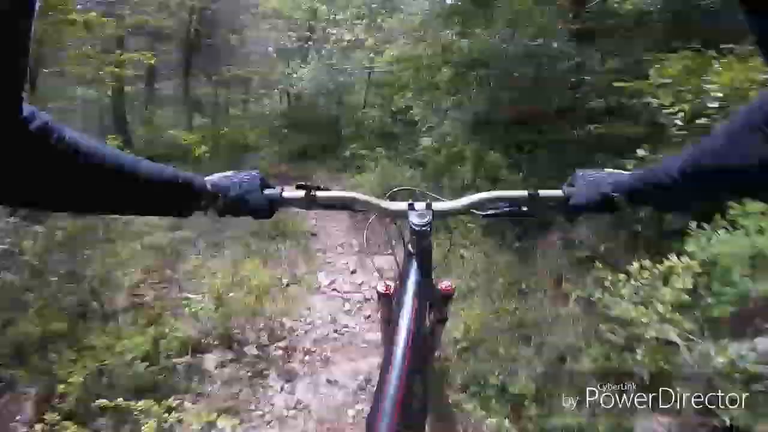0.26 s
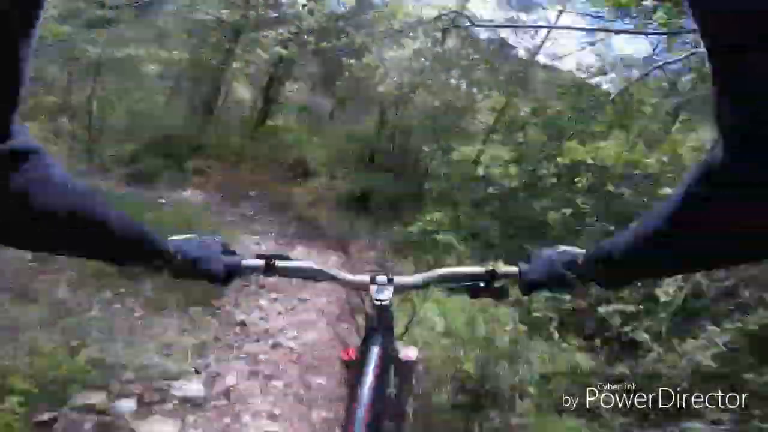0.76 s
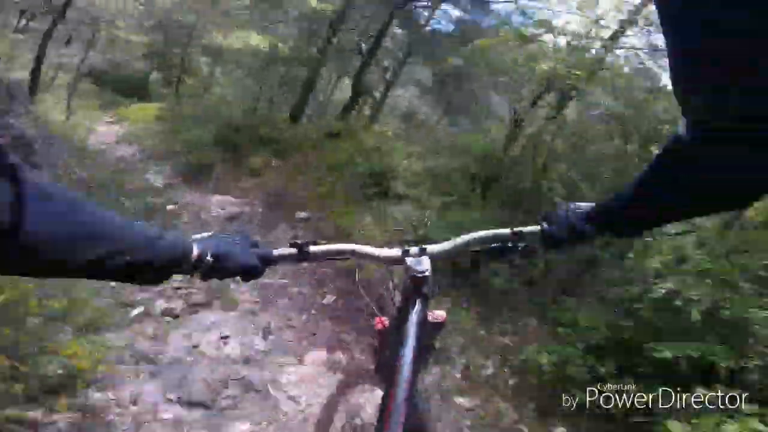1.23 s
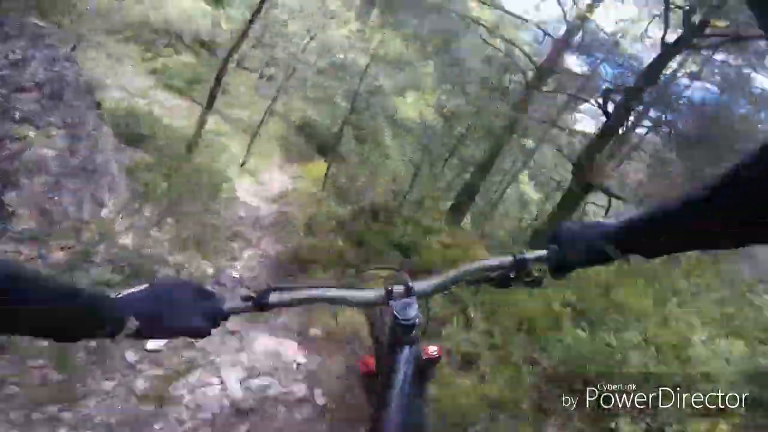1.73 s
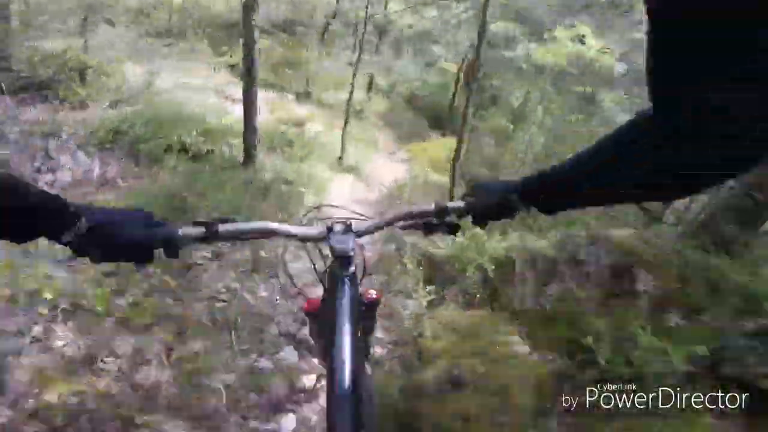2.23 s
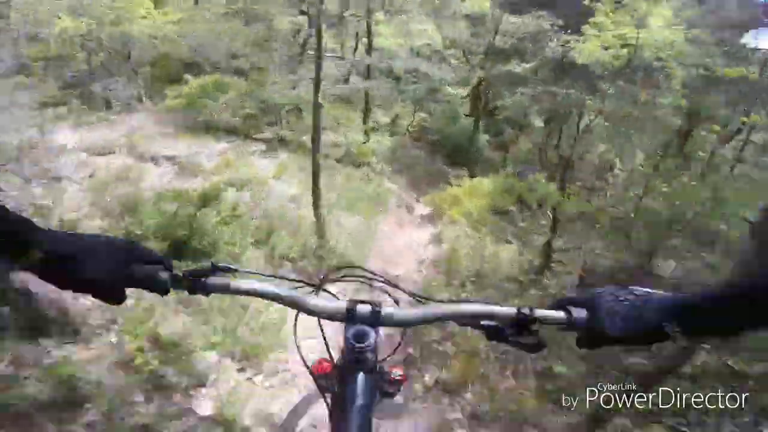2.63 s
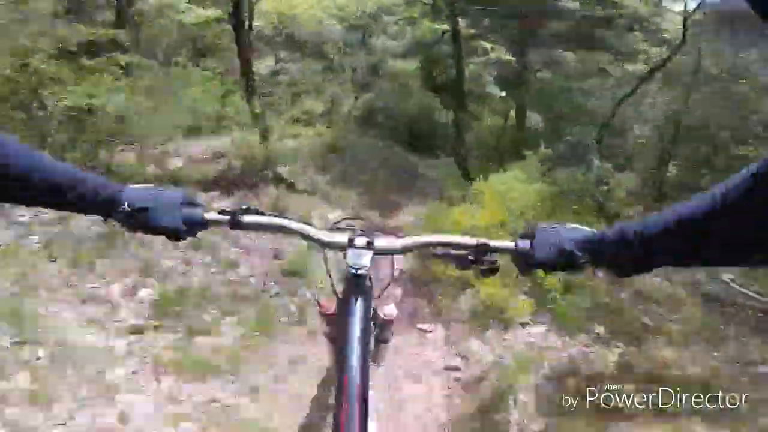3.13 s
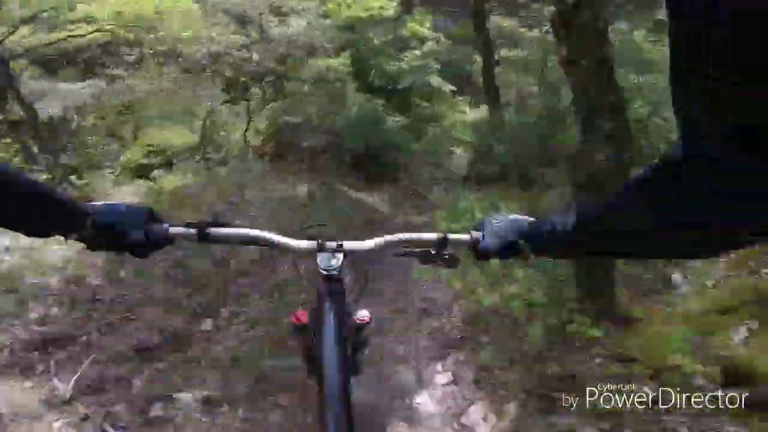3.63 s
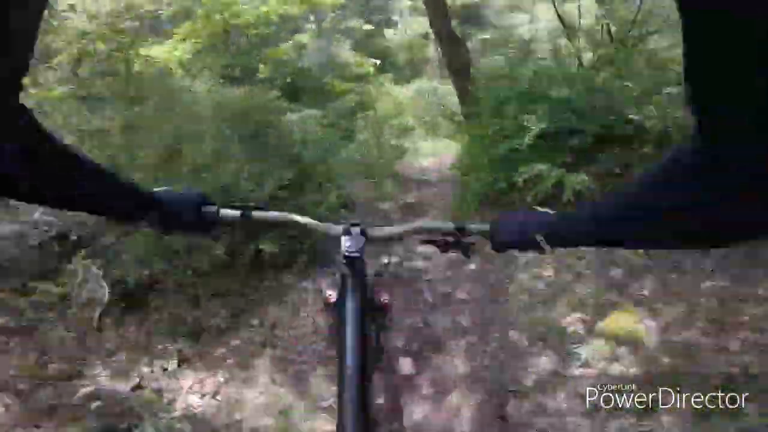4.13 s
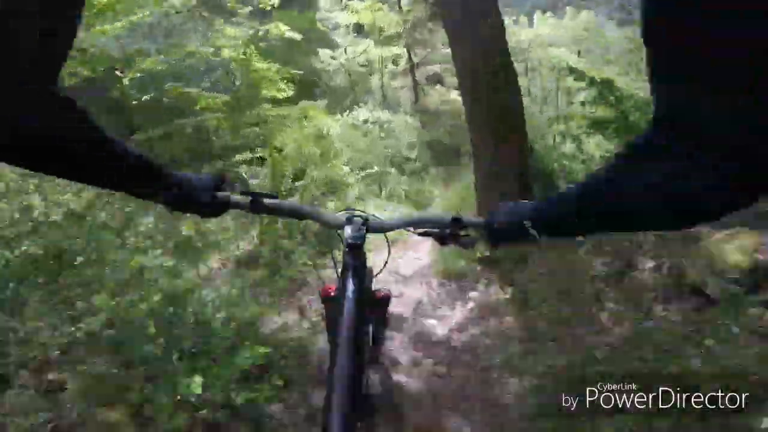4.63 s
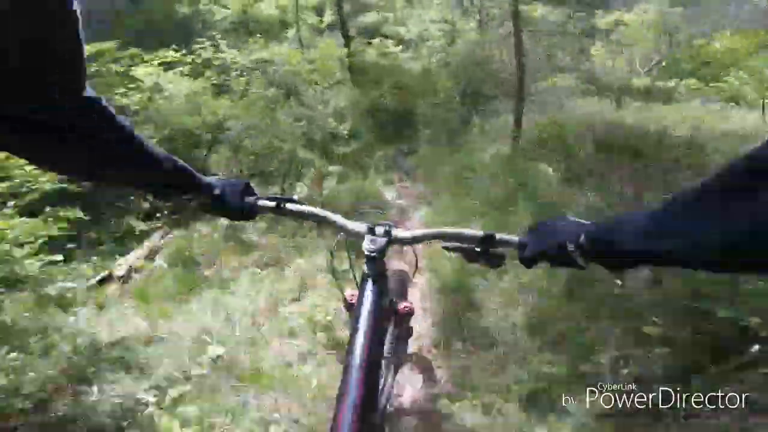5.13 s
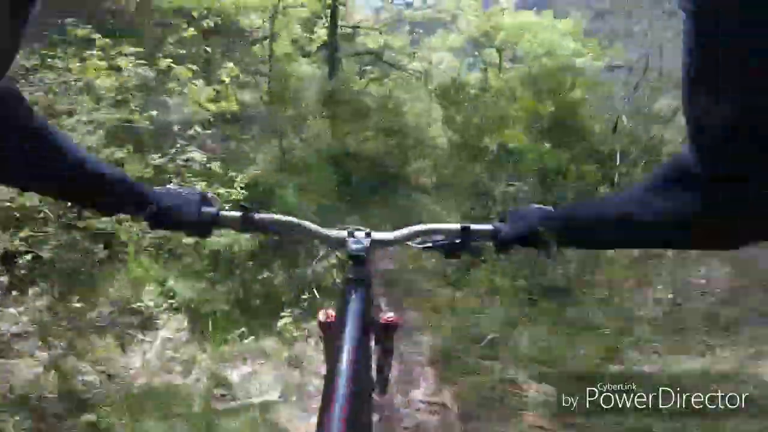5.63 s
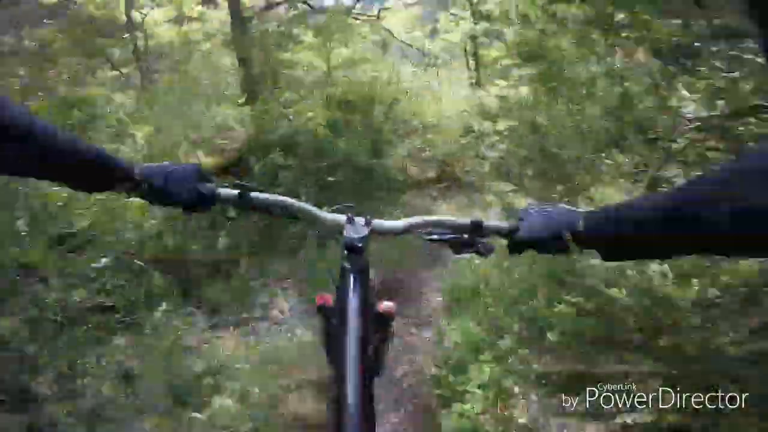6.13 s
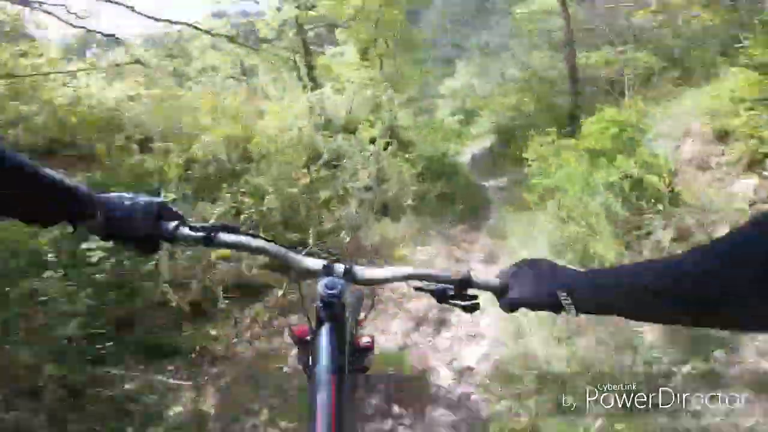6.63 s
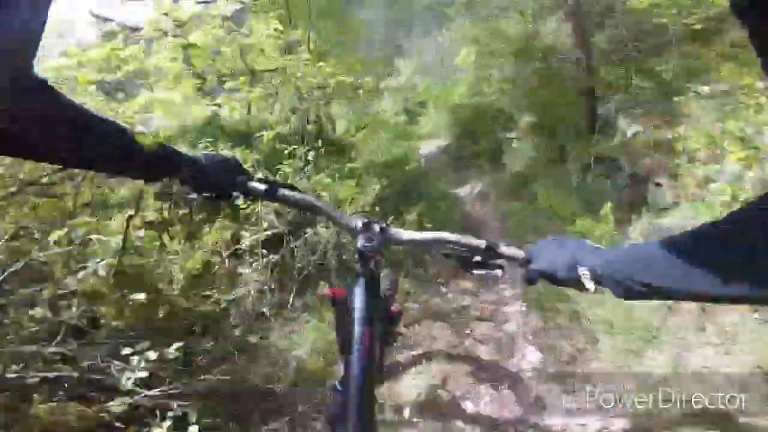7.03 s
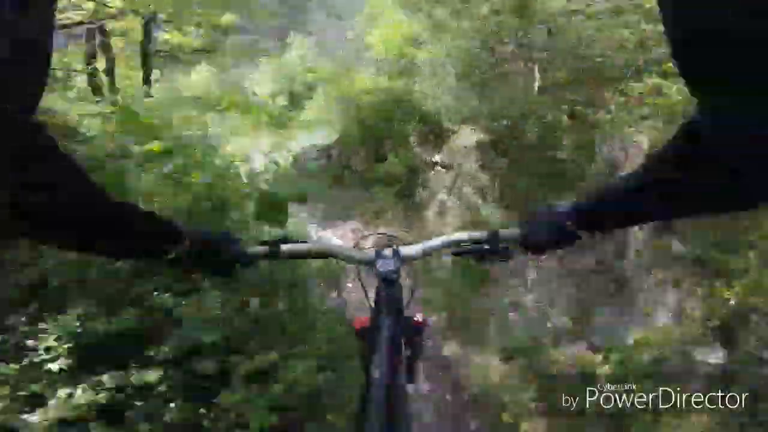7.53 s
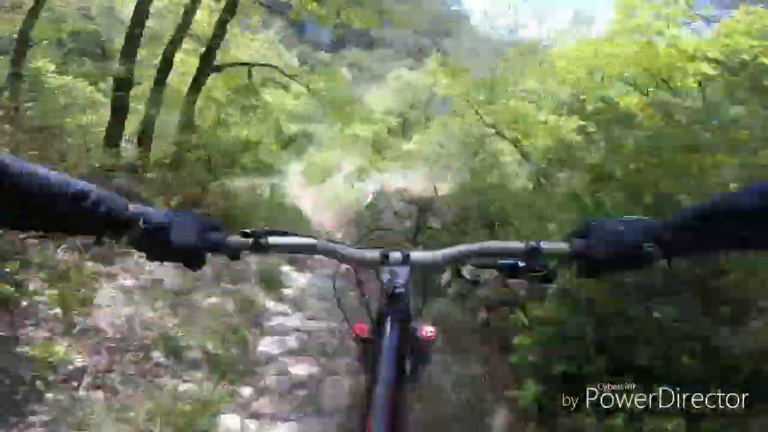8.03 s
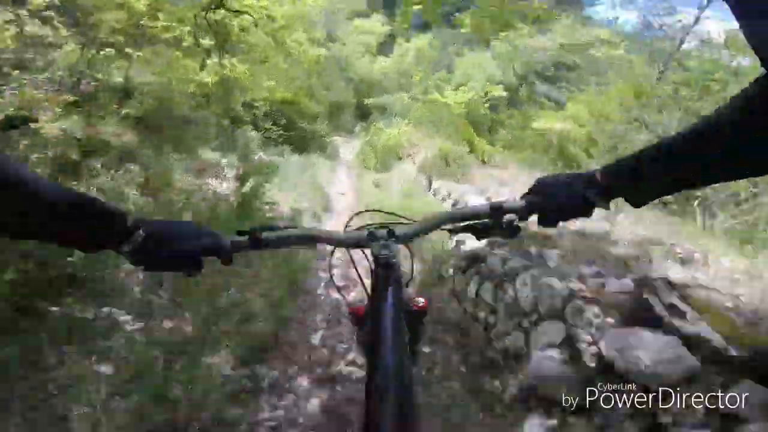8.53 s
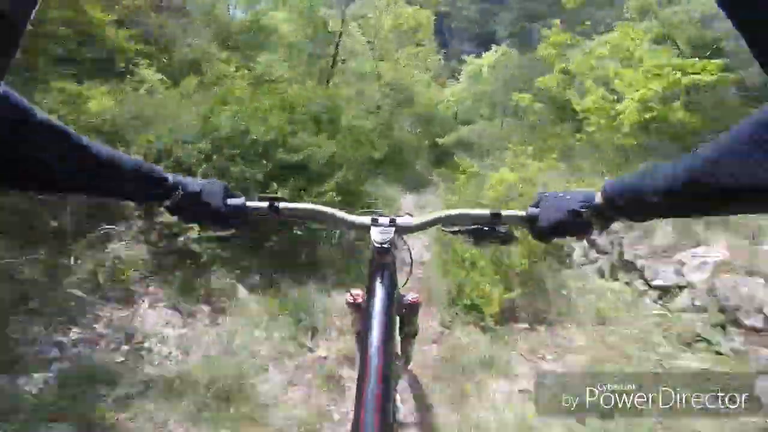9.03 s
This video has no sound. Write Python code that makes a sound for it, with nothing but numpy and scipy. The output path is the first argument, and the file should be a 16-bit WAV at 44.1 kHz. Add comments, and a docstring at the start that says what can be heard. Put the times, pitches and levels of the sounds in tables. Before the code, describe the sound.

Hard hollow knocks and dense rattle as a mountain bike rolls down a stony woodland trail, with low wind rumble buffeting a chest-worn microphone.

```python
"""Hard knocks and rattle near 1 kHz over rumbling wind: a mountain bike rolls down a stony woodland trail,
heard by a small cased microphone on the rider's chest.
Wind noise presses on the case; struck modes ring for jolts and knocks on its mount.
Chain slaps and stone ticks are short noise bursts, gravel is dense random grains,
both thin and muffled through resonances of the case."""
import sys
import numpy as np
from scipy import signal
from scipy.io import wavfile
from scipy.ndimage import uniform_filter1d

SR = 44100
rng = np.random.default_rng(int(sys.argv[2]) if len(sys.argv) > 2 else 0)


def to_wav(s):
    """Save 16-bit WAV."""
    ch = np.atleast_2d(s).T  # columns
    pcm = np.round(np.clip(ch, -1, 1) * 32767)  # PCM
    wavfile.write(sys.argv[1], SR, pcm.astype(np.int16))


N = 409248

# Wind on the case. Each row: time in seconds, slow buffet in dB, faster eddies in dB.
WIND_CURVE = [(0.0, -9.5, -17.5), (0.45, -21, -24.5), (0.9, -27, -29), (1.29, -33, -33.5),
              (1.68, -13.5, -28), (1.83, -19, -24.5), (2.04, -19, -27), (2.43, -10, -11),
              (2.58, -11.5, -19.5), (3.52, -19, -15), (3.72, -27, -22), (4.44, -18, -18.5),
              (4.96, -20, -22), (5.17, -12.5, -12.5), (5.3, -16.5, -31.5), (5.84, -24.5, -34.5),
              (6.23, -16.5, -22), (6.28, -24, -32), (6.48, -25.5, -33.5), (7.49, -14, -18),
              (7.96, -17.5, -36), (8.06, -16, -37), (8.4, -13.5, -17.5), (8.76, -16, -18.5),
              (9.28, -13.5, -17.5)]
# Short swells of low wind rumble, faint to strong. Each row: centre in seconds, level in dB,
# width in seconds (at least 0.01).
RUMBLE_SWELLS = [(0.138, -18, 0.032), (0.344, -18, 0.015), (0.518, -12.5, 0.032), (0.764, -20, 0.035),
                 (1.083, -20, 0.06), (1.291, -23.5, 0.092), (1.576, -35, 0.14), (1.767, -10.5, 0.037),
                 (1.85, -9, 0.016), (2.116, -28, 0.026), (2.34, -4, 0.032), (2.598, -29, 0.026),
                 (2.834, -12, 0.071), (3.551, -9.5, 0.077), (3.707, -22, 0.0081), (4.056, -7.5, 0.02),
                 (4.266, -17, 0.038), (4.661, -14, 0.026), (4.806, -21, 0.036), (5.16, -8, 0.025),
                 (5.341, -29, 0.02), (5.429, -31, 0.021), (5.653, -19, 0.056), (6.017, -14.5, 0.023),
                 (6.145, -24, 0.02), (6.569, -16, 0.011), (6.788, -13.5, 0.042), (6.86, -12.5, 0.024),
                 (7.132, -7, 0.027), (7.273, -4, 0.018), (7.506, -11, 0.16), (7.784, -26, 0.018),
                 (8.118, -11, 0.026), (8.261, -6, 0.01), (8.346, -6, 0.025), (8.42, -1.5, 0.012),
                 (8.635, -10, 0.039), (8.782, -9.5, 0.09), (8.856, -8, 0.019), (8.982, -11, 0.07)]
# Ride over the stones. Each row: time in seconds, rattle of the case in dB, gravel crunch in dB,
# fine spray in dB, thud of the mount in dB relative to the rattle.
RIDE_CURVE = [(0.0, -28.5, -51, -58, -4), (0.15, -30.5, -47.5, -60, 7.5), (0.31, -26.5, -46, -55, -8),
              (0.4, -27.5, -50, -58, 1), (0.53, -31.5, -50.5, -59, 2), (0.65, -22.5, -62, -76, -4),
              (0.74, -32.5, -59, -71, -2), (0.85, -34, -48, -61, 4.5), (0.98, -40.5, -62, -64.5, -11),
              (1.15, -45, -58, -62, -4), (1.34, -38.5, -51.5, -64, -3), (1.52, -31, -54, -70, -4.5),
              (1.67, -31.5, -46.5, -52, 0.5), (1.74, -28, -45, -57, -9), (1.96, -42.5, -58.5, -73, -2),
              (2.25, -33.5, -57.5, -68, -0.5), (2.35, -34, -54, -70, 8), (2.46, -38, -48, -59, -9),
              (2.54, -37.5, -54.5, -63, -4), (2.61, -30.5, -43.5, -60, -4), (2.89, -35, -56, -68, 4),
              (3.23, -41, -55, -76, -3), (3.57, -35.5, -57.5, -66, 6.5), (3.78, -40.5, -65, -75, 4),
              (3.93, -44, -76, -78, 1), (4.05, -46.5, -62, -70, -21), (4.22, -43.5, -58.5, -72, -2),
              (4.47, -32.5, -55, -63, 4.5), (5.01, -40.5, -53, -72, 2.5), (5.32, -33, -49, -62, 0.5),
              (5.45, -25, -47, -61, -1.5), (5.66, -34.5, -46, -68, 0.5), (5.84, -25.5, -44.5, -69, 4),
              (5.94, -35.5, -52.5, -68, -1.5), (6.07, -29, -50, -69, -1.5), (6.33, -34, -48.5, -57, -1.5),
              (6.38, -28.5, -46.5, -62, -6), (6.61, -38, -53.5, -62.5, -9), (6.69, -30, -51.5, -60, -2),
              (6.95, -53, -56, -70, 1), (7.11, -32, -47.5, -54.5, 0.5), (7.44, -32.5, -46, -50, -4.5),
              (7.66, -30.5, -43.5, -58, -4), (7.745, -32, -40, -44, -2.5), (7.88, -25.5, -44.5, -54.5, -2),
              (8.27, -35.5, -54.5, -66.5, 1.5), (8.42, -36, -56, -65, 6.5), (8.58, -38.5, -49, -59, -3),
              (8.66, -38.5, -59, -72, 0), (8.75, -40, -53, -58, 0.5), (8.93, -35.5, -56, -62, 4),
              (9.05, -39.5, -59, -72, -3), (9.12, -37, -64, -71, 3), (9.28, -23, -48, -68, -2)]
# Tyres skid through loose gravel. Each row: time in seconds, crunch level in dB, width in seconds (at least 0.01).
SKIDS = [(0.224, -43.5, 0.077), (0.617, -42.5, 0.1), (0.779, -47, 0.072), (1.05, -50.5, 0.089),
         (1.199, -48.5, 0.026), (1.648, -42.5, 0.021), (2.173, -49, 0.17), (2.432, -40, 0.017),
         (2.596, -53, 0.059), (3.072, -48, 0.025), (3.289, -49, 0.067), (3.479, -53, 0.016),
         (3.908, -58, 0.19), (4.132, -57, 0.089), (4.265, -57, 0.0087), (4.469, -49, 0.018),
         (4.74, -59, 0.027), (4.919, -47, 0.01), (5.531, -36.5, 0.0097), (5.647, -42, 0.045),
         (5.834, -43, 0.022), (6.214, -46.5, 0.02), (6.403, -60, 0.11), (6.91, -44.5, 0.056),
         (7.061, -44, 0.082), (7.203, -45, 0.053), (7.772, -39, 0.023), (8.09, -41, 0.036),
         (8.475, -46, 0.03), (8.8, -50, 0.16), (9.17, -48, 0.088)]
# Chain slaps and stone ticks. Each row: start in seconds, peak in dB, low share in dB relative to the peak,
# brightness in dB relative to the peak, T60 in seconds, favoured pitch in Hz.
TICK_EVENTS = [(0.0985, -24, -2, -14, 0.021, 4980), (0.1269, -8.5, -14.5, -17, 0.018, 4650),
               (0.1759, -30, -11, -10, 0.026, 3670), (0.212, -19.5, -17, -8, 0.028, 3810),
               (0.2834, -36, 11, -16, 0.026, 3590), (0.388, -43, 14, -15, 0.028, 5010),
               (0.4344, -52, -2, -18, 0.026, 3650), (0.553, -22.5, -17, -26, 0.056, 3680),
               (0.602, -32, -12, -26, 0.026, 3750), (0.62, -26, -16, -26, 0.026, 5040),
               (0.753, -46, -6, -10, 0.026, 3940), (0.7894, -11.5, -28, -18, 0.023, 4620),
               (0.8229, -33, -13, -20, 0.026, 3770), (0.9538, -42, -8, -20, 0.026, 4800),
               (1.044, -36, -15, 2, 0.026, 6020), (1.1841, -37, 1, -19, 0.026, 4930),
               (1.206, -30, 0, -12, 0.039, 5140), (1.5499, -23, -14, -6, 0.027, 4830),
               (1.5773, -23, -8, -25, 0.022, 5260), (1.6276, -37, -11, -19, 0.026, 5050),
               (1.701, -16, -2.5, -25, 0.026, 3740), (1.7209, -30, -16, -7, 0.026, 4560),
               (1.737, -13, -11, -14, 0.029, 5170), (1.8177, -28, -24, -4, 0.031, 4990),
               (1.964, -35, 0, -25, 0.044, 3780), (2.078, -35, 2, -22, 0.026, 3900),
               (2.1107, -40, 7, -22, 0.026, 3700), (2.1725, -25.5, -3, -22, 0.06, 4600),
               (2.2403, -36, -16, -14, 0.024, 6670), (2.343, -41, -14, -26, 0.03, 4800),
               (2.376, -38, -14, -24, 0.04, 5200), (2.4187, -26, -15, -8, 0.035, 4930),
               (2.507, -32, -4, -20, 0.026, 5800), (2.6603, -30, 0, -18, 0.033, 3680),
               (2.6787, -24.5, -20, -18, 0.024, 4930), (2.722, -34, -12, -7, 0.029, 5160),
               (2.8066, -34, 5, -20, 0.026, 3700), (2.8693, -45, 5, -17, 0.022, 3870),
               (2.8998, -24, -3, -26, 0.021, 5070), (2.9636, -41, -13, -12, 0.026, 3740),
               (2.973, -32, -15, -7, 0.032, 3800), (3.0654, -30.5, -10, -32, 0.023, 5190),
               (3.1017, -39, -16, -18, 0.026, 5450), (3.1377, -29, -12, -8, 0.026, 4920),
               (3.1591, -35, -5, -27, 0.026, 3460), (3.236, -35, -1, -6, 0.03, 3630),
               (3.291, -26.5, -21, -8, 0.034, 5910), (3.3164, -32, -21, -15, 0.026, 5330),
               (3.459, -47, -5, -23, 0.026, 5120), (3.4779, -37, -20, -23, 0.029, 3710),
               (3.719, -45, -2, 0, 0.019, 3490), (3.7914, -44, -10, -22, 0.026, 5000),
               (3.8967, -28.5, -3, -28, 0.027, 4970), (3.9134, -39, -14, -24, 0.026, 5120),
               (4.0058, -43, 4, -15, 0.03, 3300), (4.042, -41, 5, -25, 0.031, 3600),
               (4.0574, -35, -1, -19, 0.026, 3500), (4.085, -27, -24, -18, 0.03, 4980),
               (4.103, -33, -23, -16, 0.026, 5270), (4.1263, -34, -12, -22, 0.028, 5120),
               (4.202, -39, 4, -25, 0.03, 3700), (4.2563, -34, 2, -34, 0.037, 3670),
               (4.385, -42, -4, -22, 0.026, 3700), (4.5669, -41, -13, -13, 0.026, 3730),
               (4.728, -33, -6, -23, 0.026, 3430), (4.745, -26.5, -9, -14, 0.064, 3710),
               (4.8131, -39, -15, -8, 0.026, 3700), (4.864, -37, -18, -2, 0.021, 3740),
               (4.993, -26.5, -21, -11, 0.069, 4840), (5.0246, -30.5, -6, -13, 0.029, 3470),
               (5.072, -35, 7.5, -31, 0.038, 5290), (5.24, -31, -6, -19, 0.026, 3320),
               (5.267, -31, -16, -24, 0.028, 4790), (5.288, -27, -16, -10, 0.041, 3850),
               (5.348, -22, -16, -19, 0.026, 4980), (5.3887, -25, -3, -17, 0.03, 3520),
               (5.4128, -25, -16, -11, 0.031, 4010), (5.4508, -17.5, -16, -15, 0.078, 3740),
               (5.4954, -20, -4, -12, 0.027, 3860), (5.525, -26, -13, -12, 0.026, 3710),
               (5.567, -25.5, -18, -19, 0.024, 3680), (5.584, -25, -17, -15, 0.026, 4970),
               (5.6093, -36, -14, -19, 0.029, 5090), (5.6245, -22, -14, -11, 0.064, 4830),
               (5.659, -15.5, -4, -22, 0.026, 4740), (5.691, -28, -13, -19, 0.035, 5700),
               (5.7127, -21, -8, -19, 0.026, 3500), (5.769, -19.5, -6, -21, 0.026, 3570),
               (5.821, -29, -4, -23, 0.026, 3690), (5.8494, -38, -5, -18, 0.026, 5120),
               (5.8725, -10.5, -10, -13, 0.028, 4640), (5.941, -34, -7, -23, 0.026, 3550),
               (6.015, -17.5, -4, -16, 0.029, 3810), (6.07, -32, -11, -18, 0.032, 5030),
               (6.122, -14, -18, -20, 0.02, 3710), (6.157, -27.5, -20, -15, 0.036, 3760),
               (6.2501, -42, -14, -21, 0.026, 3920), (6.319, -19, -24, -7, 0.031, 4940),
               (6.3743, -29, -6, -20, 0.029, 4040), (6.406, -10, -5, -28, 0.023, 3750),
               (6.4801, -40, -11, -11, 0.026, 3850), (6.492, -30, -16, -7, 0.03, 3840),
               (6.5586, -44, 9, -20, 0.026, 3700), (6.6497, -35, -13, -23, 0.026, 5050),
               (6.723, -20, -25, -18, 0.029, 5280), (6.8918, -17, -9, -10, 0.024, 3540),
               (6.9186, -26, -19, -25, 0.026, 3670), (6.949, -31, -2, -25, 0.041, 3610),
               (7.049, -18.5, -0.5, -12, 0.029, 5850), (7.2546, -30, -12, -4, 0.032, 3520),
               (7.3895, -25.5, 0, -7, 0.046, 4990), (7.4954, -29, -20, -24, 0.024, 3930),
               (7.635, -31, -9, -6, 0.026, 4870), (7.656, -22, -4, -11, 0.055, 5530),
               (7.7423, -38, -9, -2, 0.022, 3830), (7.7587, -35, -14, -17, 0.026, 5110),
               (7.818, -30, 1, -20, 0.026, 3560), (7.9797, -29, 2, -21, 0.056, 5090),
               (8.082, -22, -15, -28, 0.024, 3670), (8.136, -20.5, -14, -28, 0.018, 4760),
               (8.1872, -36, -11, -19, 0.026, 3630), (8.226, -40, -10, -22, 0.03, 5100),
               (8.34, -46, 11, -24, 0.03, 3700), (8.452, -25.5, -5, -22, 0.024, 3660),
               (8.5869, -35, -19, -21, 0.026, 5080), (8.6922, -44, -4, -24, 0.026, 3700),
               (8.777, -40, -10, -20, 0.03, 5200), (8.818, -39, 6, -16, 0.03, 3700),
               (8.8542, -29.5, -2, -13, 0.037, 3600), (8.894, -39, 0, -20, 0.026, 3700),
               (8.9616, -38, -3, -10, 0.028, 5800), (8.98, -37, 0, -14, 0.026, 4800),
               (9.0986, -38, 5, -24, 0.026, 5250), (9.1634, -22, -22, -25, 0.061, 6580),
               (9.219, -32, -12, -21, 0.026, 5160)]
# Knocks of the case on its mount. Each row: time in seconds, peak in dB, favoured pitch in Hz,
# thud in dB relative to the peak, clatter in dB relative to the peak, contact chatter in seconds (at most 0.1).
KNOCK_EVENTS = [(0.081, -11, 1080, -7, -26, 0.06), (0.095, -8.5, 1010, -14, -27, 0.028),
                (0.112, -13, 1040, -10, -22, 0.031), (0.169, -11, 1050, -1, -20, 0.061),
                (0.179, -10, 1000, -13, -24, 0.02), (0.189, -17, 900, -10, -24, 0.015),
                (0.237, -26, 1110.0, 0, -20, 0.043), (0.257, -9.5, 1040, -8, -22, 0.039),
                (0.269, -14, 1060, -19, -25, 0.023), (0.282, -8, 1000, -2.5, -31, 0.031),
                (0.33, -12.5, 980, -16, -12, 0.053), (0.347, -11.5, 990, -1, -14, 0.031),
                (0.362, -13.5, 1000, -1.5, -20, 0.03), (0.433, -11.5, 1010, -14, -13, 0.0091),
                (0.463, -13, 870.0, -17, -27, 0.0077), (0.487, -9.5, 1010, -17, -28, 0.014),
                (0.577, -9.5, 1000, -19, -18, 0.039), (0.595, -6.5, 880, -16, -19, 0.041),
                (0.606, -10.5, 1060, -9, -16, 0.039), (0.627, -19, 1060, -8, -20, 0.036),
                (0.656, -25, 850, -8, -23, 0.018), (0.712, -1.5, 865, -40, -19, 0.018),
                (0.761, -14, 970, -19, -15, 0.1), (0.788, -16, 1030, -12, -7, 0.036),
                (0.825, -8.5, 845, -2, -25, 0.016), (0.849, -9.5, 1050, -6, -26, 0.028),
                (1.008, -25, 750, -4, -24, 0.02), (1.047, -34, 1000, -11, -13, 0.019),
                (1.205, -22, 830.0, -12, -21, 0.018), (1.538, -20, 840, -1, -12, 0.024),
                (1.57, -17.5, 710.0, -6, -7, 0.0074), (1.625, -36, 1040.0, 7, -23, 0.06),
                (1.702, -13.5, 1070.0, -29, -6, 0.0074), (1.781, -10.5, 930, -18, -10, 0.0082),
                (1.843, -19.5, 1010, -4, -30, 0.0074), (1.966, -19, 1010, -22, -29, 0.0097),
                (2.007, -29, 900, -2, -24, 0.015), (2.028, -18.5, 900, 3, -20, 0.033),
                (2.11, -21.5, 900, -9, -3, 0.016), (2.152, -20, 900, -11, -20, 0.015),
                (2.174, -13.5, 825, -1.5, -21, 0.015), (2.338, -18, 720.0, -12, -18, 0.011),
                (2.368, -15, 855, -4, -23, 0.015), (2.379, -15, 900, 5.5, -26, 0.017),
                (2.412, -17.5, 1080, 1.5, -21, 0.061), (2.508, -12, 835, -7, -13, 0.011),
                (2.562, -15.5, 1040, -8, -30, 0.0072), (2.61, -17.5, 1070, 4, -10, 0.01),
                (2.643, -13.5, 800, -6, -20, 0.035), (2.651, -10.5, 920, -7.5, -13, 0.044),
                (2.727, -25, 1040, -6, -24, 0.045), (2.739, -19, 900, 1, -16, 0.017),
                (2.749, -13.5, 780, -3, -27, 0.009), (2.957, -16, 820, -5, -31, 0.035),
                (2.996, -20.5, 1040, -10, -25, 0.041), (3.042, -20.5, 990, -10, -22, 0.092),
                (3.065, -23, 1030, 0, -1, 0.024), (3.143, -21, 790, -6, -11, 0.12),
                (3.253, -21, 650, 0, -24, 0.015), (3.285, -31, 800, -4, -22, 0.015),
                (3.326, -25.5, 900, 10, -24, 0.014), (3.46, -35, 900, -3, -19, 0.02),
                (3.536, -27.5, 716, 10, -14, 0.072), (3.7183, -3, 1056, -8, -19, 0.0079),
                (3.997, -21.5, 800, 0, -15, 0.01), (4.046, -21.5, 796, -4, -23, 0.04),
                (4.115, -23, 1050.0, -17, -29, 0.009), (4.072, -22, 1000, -12, -20, 0.015),
                (4.162, -23, 1050, 0, -12, 0.012), (4.192, -21, 900, -11, -27, 0.02),
                (4.2, -18.5, 1000.0, 2.5, -24, 0.027), (4.284, -24, 1000, 4, -15, 0.04),
                (4.472, -22, 1060, -6, -10, 0.018), (4.2556, -11.5, 905, -0.5, -14, 0.046),
                (4.463, -22, 1080.0, -4, -22, 0.022), (4.591, -22, 900, -4, -22, 0.015),
                (4.7225, -15, 850, -28, -25, 0.008), (4.7268, -4.5, 880, -4.5, -10.5, 0.004),
                (4.731, -14, 700, -5, -7, 0.017), (4.735, -19, 1100, -11, 0, 0.013),
                (4.867, -21.5, 825, -18, -34, 0.0083), (5.004, -25.5, 900, -3, -22, 0.015),
                (5.052, -18.5, 910, 1.5, -20, 0.029), (5.116, -19, 880, -6, -27, 0.044),
                (5.199, -20, 910, -9, -20, 0.043), (5.24, -16.5, 880, -2, -10, 0.042),
                (5.268, -13.5, 814, -11, -23, 0.0099), (5.431, -14, 990, -7, -26, 0.016),
                (5.451, -17, 1030, 0.5, -14, 0.009), (5.5, -19.5, 830.0, 7.5, -22, 0.021),
                (5.523, -25, 810.0, -3, -22, 0.032), (5.617, -15, 1070, -6, -9, 0.01),
                (5.691, -16.5, 880.0, 1, -19, 0.014), (5.73, -14, 1020, -1, -23, 0.012),
                (5.66, -21, 900, -16, -20, 0.014), (5.76, -27, 1000, -4, -22, 0.012),
                (5.7834, -8, 780, -3, -2, 0.0054), (5.79, -10, 900, -18, -9, 0.019),
                (5.822, -12, 1000, -10, -18, 0.012), (5.828, -8, 1000, -6, -10, 0.022),
                (5.837, -15, 850, -15, 2.5, 0.017), (5.8499, -7.5, 1000, -5, -4, 0.0037),
                (5.921, -18.5, 1020.0, -20, -29, 0.0082), (6.059, -18.5, 710.0, 4, -26, 0.0095),
                (6.137, -13.5, 844, -8, -16, 0.035), (6.211, -18, 835, 3.5, -11, 0.042),
                (6.376, -24.5, 1000.0, 10, -20, 0.095), (6.4046, -1.5, 1015, -13, -28, 0.027),
                (6.479, -20.5, 1030, 2.5, -12, 0.067), (6.561, -23, 900, 0, -2, 0.013),
                (6.672, -27, 940, -11, -26, 0.031), (6.865, -20, 990, -11, -23, 0.009),
                (6.895, -17.5, 850.0, -19, -27, 0.015), (6.926, -14.5, 880, -16, -19, 0.04),
                (6.953, -14.5, 900.0, -2.5, -28, 0.0055), (6.978, -6, 880, -1, -34, 0.0075),
                (7.012, -21, 1060, 5.5, -7, 0.074), (7.189, -33, 945, -2, -22, 0.02),
                (7.496, -18.5, 1010, -4, -11, 0.009), (7.539, -34, 950, 0, -22, 0.015),
                (7.606, -19.5, 740, 0.5, -6, 0.17), (7.657, -13.5, 1080.0, -12, -6, 0.02),
                (7.684, -18.5, 1070, 1, -22, 0.036), (7.718, -14, 850.0, -21, -27, 0.0082),
                (7.768, -9.5, 1054, -7, -26, 0.027), (7.784, -20, 850, 5, -26, 0.042),
                (7.86, -14.5, 900, -7, -11, 0.034), (7.89, -9, 915, -4.5, -14, 0.035),
                (7.916, -17, 1050, -13, -26, 0.026), (7.966, -13, 1000, -5, -30, 0.032),
                (7.975, -9.5, 1040, -4, -33, 0.022), (7.987, -12, 1060, 4.5, -28, 0.033),
                (8.078, -20, 1000, -11, -24, 0.042), (8.09, -9.5, 880, -1.5, -26, 0.017),
                (8.136, -18, 1000, -10, -9, 0.013), (8.176, -17, 920, -15, -19, 0.056),
                (8.259, -28, 900, -7, -24, 0.015), (8.294, -19.5, 900, 1, -22, 0.042),
                (8.411, -30, 900, 4, -22, 0.017), (8.5, -19, 900, -3, -15, 0.015),
                (8.545, -20, 950, -10, -20, 0.015), (8.587, -15.5, 900, -3, -24, 0.045),
                (8.693, -19, 800, -2, -12, 0.058), (8.805, -20.5, 880, -1, -21, 0.14),
                (8.868, -17, 895, 1, -15, 0.045), (9.038, -36, 900, -1, -31, 0.015),
                (9.103, -17.5, 844, 0, -15, 0.025), (9.163, -12.5, 885, -7, -14, 0.012),
                (9.194, -24, 1000, 7, -21, 0.0072), (9.218, -10, 880, -8, -41, 0.0071),
                (9.246, -14, 960, 0, -26, 0.017)]
# Ring of the case. Each row: mode in Hz, level in dB, T60 in seconds.
CASE_MODES = [(602, -3, 0.025), (712, 4, 0.023), (840.6, 4, 0.026), (1009, 9, 0.021), (1070.7, 10, 0.016),
              (1311, 0.5, 0.0097)]
# Thud of the mount. Each row: mode in Hz, level in dB, T60 in seconds.
MOUNT_MODES = [(207, -2.5, 0.022), (326.6, -8, 0.038), (467.4, -5.5, 0.02)]
# Clip of the mount. Each row: mode in Hz, level in dB, T60 in seconds.
CLIP_MODES = [(1280, 3, 0.011), (1840, -3, 0.017), (2110, -4, 0.0048)]
# Airborne sound let through the case, low. Each row: centre in Hz, width in Hz, level in dB.
LEAK_LOW_PEAKS = [(1510, 730, 1.5), (2810, 455, 10.5)]
# Airborne sound let through the case, middle. Each row: centre in Hz, width in Hz, level in dB.
LEAK_MIDDLE_PEAKS = [(3680, 780, 5), (4600, 320, 5), (5000, 830, 6.5), (7180, 1600, -6)]
# Airborne sound let through the case, top. Each row: centre in Hz, width in Hz, level in dB.
LEAK_TOP_PEAKS = [(7070, 2500, 30.5), (9900, 1000, -39), (11300, 2000, 22)]
# Narrow rings of the case that grit sets off. Each row: centre in Hz, width in Hz, level in dB.
GRIT_PEAKS = [(2630, 100, 4), (3710, 240, 4), (5100, 280, -0.5)]
# Dips of the microphone port. Each row: centre in Hz, width in Hz, depth from 0 to 1.
PORT_DIPS = [(2895, 610, 0.75), (4250, 520, 0.2), (7640, 200, 0.24)]

# wind
RUMBLE_BAND_HZ = [8.6, 40.6]
EVENED_SHARE = 0.47   # how far chance swells are evened out, 0-1
WALL_LIMIT = 0.8   # amplitude the case wall gives no further than
FLUTTER_DB, FLUTTER_LOW_HZ, FLUTTER_HIGH_HZ = -22.5, 106, 306   # level relative to the pressure
# gravel and skids
EVEN_HISS_DB = -8.5   # relative to the grit
GRIT_RING_DB, GRIT_PER_S = -8, 420   # level relative to the crunch
SPRAY_TOP_HZ = 12800
SKID_RISE, SKID_FALL, SKID_LEAD = 0.72, 1.35, 0.21   # shares of the width
SKID_RATTLE_DB, SKID_SPRAY_DB = 15.5, -17.5   # relative to the crunch of the skid
# rattle
HUM_DB, HUM_YIELD_DB_PER_DB = -8, 0.57   # even tyre vibration relative to the jolts; it yields as rattle grows
ROLL_DB, ROLL_BAND_HZ = -12, [310, 880]   # roll of the tyres through the frame, relative to the rattle
MOUNT_WANDER_DB = 1   # how far the thud strays from the rattle
# ticks
TICK_COLOUR_DB = 5.5   # tick-to-tick spread of each resonance
TICK_FOCUS_DB_PER_OCTAVE = 12   # fall of resonances away from the favoured pitch
TICK_STRIKE = 1.75   # first contact, added to the noise tail
# knocks
FOCUS_DB_PER_OCTAVE = 20.5   # fall of modes away from the favoured pitch
STRIKE, CLEAN_S, CLEAN_POWER = 1.6, 0.035, 1.2   # first contact; it is stronger for chatter below CLEAN_S
BUILD_S = 0.0015   # a blow lands this long before its ring is heard
CRACK_DB, CRACK_FADE_S = -2.5, 0.0052   # relative to the peak; the crack is weaker the longer the chatter
CRACK_BAND_HZ = [350, 1380]
# microphone
CLIP_LEVEL, CUTOFF_HZ = 0.92, 15600


def from_db(db):
    """Decibels to gain."""
    return 10 ** (np.asarray(db) / 20)


def rms_one(x):
    """Scale to rms 1."""
    return x / np.sqrt(np.mean(x ** 2) + 1e-20)


def every_sample(slow):
    """Interpolate a curve given at every 40th sample."""
    return np.interp(np.arange(N) / 40, np.arange(len(slow)), slow)


def in_time(rows):
    """Columns of a curve table, one value per sample."""
    s, *columns = np.transpose(rows)
    return [np.interp(np.arange(N) / SR, s, column) for column in columns]


def drift(rate_hz):
    """Slow chance, rms 1: noise at every 40th sample through a double one-pole low-pass."""
    r = np.exp(-80 * np.pi * rate_hz / SR)
    slow = signal.lfilter([1], [1, -2 * r, r * r], rng.standard_normal(N // 40 + 2002))
    return every_sample(rms_one(slow[2000:]))   # settling time dropped


def swells(rows, rise=1, fall=1, lead=0):
    """Sum of bell-shaped envelopes, one per row; rise, fall and lead are shares of the width."""
    s, level_db, width_s = np.transpose(rows)[:, :, None]
    width_s = np.clip(width_s, .01, .3)
    t = np.arange(0, N + 40, 40) / SR - s + lead * width_s
    side_s = width_s * np.where(t < 0, rise, fall)
    bells = from_db(level_db) * 2 ** (-2 * (t / side_s) ** 2)
    return every_sample(bells.sum(axis=0))


def butter(x, hz, kind, order=2):
    """Butterworth filter."""
    return signal.sosfilt(signal.butter(order, hz, kind, fs=SR, output="sos"), x)


def ring(x, modes):
    """Struck modes in parallel, signs alternating: each a decaying sine per impulse."""
    out = 0
    for k, (hz, level_db, t60_s) in enumerate(modes):
        r, w = from_db(-60 / (t60_s * SR)), 2 * np.pi * hz / SR
        mode = signal.lfilter([0, np.sin(w)], [1, -2 * r * np.cos(w), r * r], x + 1e-18)
        out = out + (-1) ** k * from_db(level_db) * mode
    return out


def resonate(x, peaks):
    """Two-pole band-pass resonances in parallel, signs alternating."""
    out = 0
    for k, (hz, width_hz, level_db) in enumerate(peaks):
        r = np.exp(-np.pi * width_hz / SR)
        b = (1 - r * r) / 2 * np.array([1, 0, -1])
        a = [1, -2 * r * np.cos(2 * np.pi * hz / SR), r * r]
        out = out + (-1) ** k * from_db(level_db) * signal.lfilter(b, a, x + 1e-18)
    return out


def grains(per_s, spread_db):
    """Random clicks of either sign, with a long but bounded tail of large ones."""
    sizes = from_db(spread_db * np.minimum(rng.exponential(1, N), 4)) * rng.choice([-1, 1], N)
    return sizes * (rng.random(N) < per_s / SR)


def bursts(starts_s, gains, t60_s, body, rise_s, hold, strike=0, strike_samples=12, size=4000):
    """Strike plus noise burst through a body, scaled to its peak; hold above 1 delays the decay."""
    t = np.arange(size) / SR
    fall = from_db(-60 * (t / np.clip(t60_s, .001, .1)[:, None]) ** hold)
    contact = rng.standard_normal((len(starts_s), size)) * (1 - np.exp(-t / rise_s)) * fall
    contact[:, :strike_samples] += np.reshape(strike, (-1, 1))
    out = np.zeros(N + size)
    for s, gain, shape in zip(starts_s, gains, body(contact)):
        at = round(s * SR)
        out[at:at + size] += gain * shape / np.abs(shape).max()
    return out[:N]


def evened(x, size):
    """Long chance swells are partly levelled; rms 1."""
    power = uniform_filter1d(x ** 2, size=size)
    return rms_one(x / (power + 1e-12) ** (EVENED_SHARE / 2))


def wind():
    """Slow pressure lumps and faster eddies: low noise bands, muffled by the wall of the case."""
    buffet_db, eddy_db = in_time(WIND_CURVE)
    white = rng.standard_normal((2, N + SR))   # the first second lets the filters settle
    slow = butter(butter(white[0], [8, 38], "band", order=1), 31.0, "low")[SR:]
    slow = evened(slow, size=11000)
    eddies = butter(butter(white[1], [40, 85], "band", order=1), 104, "low", order=1)[SR:]
    eddies = butter(eddies, 1200, "low") * from_db(2.0 * drift(9.8))
    eddies = evened(eddies, size=9000)
    return from_db(buffet_db) * slow + from_db(eddy_db) * eddies


def rumble_swells():
    """Short swells of low wind rumble, faint to strong; the noise's own ups and downs are evened out."""
    churn = butter(rng.standard_normal(N + SR), RUMBLE_BAND_HZ, "band", order=1)[SR:]
    churn = butter(churn, 100, "low")
    churn = churn / np.sqrt(uniform_filter1d(churn ** 2, size=1500) + 1e-12)
    return swells(RUMBLE_SWELLS) * churn


def buffeting():
    """Wind presses on the wall, which yields less as the pressure peaks; flutter follows the pressure."""
    push = wind() + rumble_swells()
    push = push / (1 + np.abs(push / WALL_LIMIT) ** 4) ** .25
    flutter = butter(rng.standard_normal(N), FLUTTER_LOW_HZ, "high")
    flutter = rms_one(butter(flutter, FLUTTER_HIGH_HZ, "low"))
    pressure = uniform_filter1d(np.abs(push), size=200)
    return push + from_db(FLUTTER_DB) * pressure * flutter


def leak(x, strengths):
    """Middle resonances of the case, each with a strength of its own."""
    pairs = enumerate(zip(LEAK_MIDDLE_PEAKS, strengths))
    return sum((-1) ** k * g * resonate(x, [peak]) for k, (peak, g) in pairs)


def crunch(crunch_db, spray_db, shake):
    """Gravel grinds in uneven grains that grow with the jolts; fine spray hisses above."""
    grit = grains(3500 * from_db(3.3 * drift(18)), spread_db=3.5)
    grit = rms_one(grit * from_db(1.9 * drift(34) + 1.6 * shake))
    grit = grit + from_db(EVEN_HISS_DB) * rng.standard_normal(N)
    coarse = rms_one(resonate(grit, LEAK_LOW_PEAKS)) * from_db(-1.5 + 2.9 * drift(21))
    strengths = [from_db(2.4 * drift(15)) for peak in LEAK_MIDDLE_PEAKS]
    middle = rms_one(butter(leak(grit, strengths), 5100, "low"))
    crackle = 0
    for peak in GRIT_PEAKS:
        clicks = grains(GRIT_PER_S, spread_db=4.5)
        crackle = crackle + resonate(clicks, [peak]) * from_db(3.0 * drift(6.0))
    crackle = rms_one(crackle) * from_db(GRIT_RING_DB)
    spray = resonate(grains(14000, spread_db=4.5), LEAK_TOP_PEAKS)
    spray = rms_one(butter(spray, SPRAY_TOP_HZ, "low", order=6))
    spray = spray * from_db(2.9 * drift(25) + 1.0 * drift(2.9))
    return from_db(crunch_db) * (coarse + middle + crackle) + from_db(spray_db) * spray


def ticks():
    """Chain slaps and stone ticks: sharp cracks with a short dying tail, coloured by the case."""
    s, peak_db, low_db, bright_db, t60_s, pitch_hz = np.transpose(TICK_EVENTS)
    away_octaves = np.abs(np.log2(np.array(LEAK_MIDDLE_PEAKS)[:, :1] / pitch_hz))
    colour_db = TICK_COLOUR_DB * rng.standard_normal(away_octaves.shape)
    strengths = from_db(colour_db - TICK_FOCUS_DB_PER_OCTAVE * away_octaves)[:, :, None]
    middle = bursts(s, from_db(peak_db), t60_s, lambda x: butter(leak(x, strengths), 9000, "low"),
                    rise_s=0.000095, hold=0.69, strike=TICK_STRIKE, strike_samples=2, size=2200)
    low = bursts(s, from_db(peak_db + low_db), t60_s, lambda x: resonate(x, LEAK_LOW_PEAKS),
                 rise_s=0.00012, hold=1.0, size=2200)
    top = bursts(s, from_db(peak_db + bright_db), 1.5 * t60_s, lambda x: resonate(x, LEAK_TOP_PEAKS),
                 rise_s=0.00072, hold=0.64, size=2200)
    return middle + low + top


def case_ring(x, strengths):
    """Each case mode is struck with a strength of its own; the wall cuts steeply above the modes."""
    pairs = enumerate(zip(CASE_MODES, strengths))
    modes = sum((-1) ** k * ring(x * g, [mode]) for k, (mode, g) in pairs)
    return butter(modes, 1600, "low", order=4)


def mount_ring(x):
    """The soft mount thuds in low modes and passes little treble."""
    return butter(ring(x, MOUNT_MODES), 1380, "low")


def clip_ring(x):
    """The clip of the mount clatters in short modes, low-passed."""
    return butter(ring(x, CLIP_MODES), 1750, "low", order=3)


def rattle(case_db, mount_db, shake):
    """Dense small jolts, in clumps, and even tyre vibration shake the case and its mount."""
    jolts = grains(1500 * from_db(1.5 * shake), spread_db=2.5) * from_db(2.54 * shake)
    hum = from_db(HUM_DB - HUM_YIELD_DB_PER_DB * (case_db - case_db.mean()))
    jolts = (rms_one(jolts) + hum * rng.standard_normal(N)) / np.sqrt(1 + hum ** 2)
    strengths = [from_db(1.4 * drift(38)) for mode in CASE_MODES]
    case = rms_one(case_ring(jolts, strengths))
    airborne = from_db(-22.5) * rms_one(resonate(jolts, LEAK_LOW_PEAKS))
    roll = rms_one(butter(rng.standard_normal(N), ROLL_BAND_HZ, "band"))
    roll = from_db(ROLL_DB + 4.1 * drift(15)) * roll
    mount = rms_one(mount_ring(jolts))
    return from_db(case_db) * (case + airborne + roll) + from_db(mount_db) * mount


def knocks():
    """Strike and contact chatter ring case, mount and clip; longer chatter swells slower."""
    s, peak_db, pitch_hz, thud_db, clatter_db, chatter_s = np.transpose(KNOCK_EVENTS)
    s = s - BUILD_S
    strengths = [from_db(-FOCUS_DB_PER_OCTAVE * np.abs(np.log2(hz / pitch_hz)))[:, None]
                 for hz, level_db, t60_s in CASE_MODES]
    bounded_s = np.clip(chatter_s, .002, .1)
    rise_s, hold = 0.018 * bounded_s[:, None], 1.9
    strike = STRIKE * (CLEAN_S / bounded_s) ** CLEAN_POWER
    case = bursts(s, from_db(peak_db), chatter_s, lambda x: case_ring(x, strengths), rise_s, hold, strike)
    thud = bursts(s, from_db(peak_db + thud_db), chatter_s, mount_ring, rise_s, hold, strike)
    crack_gain = from_db(peak_db + CRACK_DB) * np.exp(-chatter_s / CRACK_FADE_S)
    crack = bursts(s + BUILD_S / 2, crack_gain, chatter_s / 2, lambda x: butter(x, CRACK_BAND_HZ, "band"),
                   rise_s, hold, strike, size=1000)
    clatter = bursts(s, from_db(peak_db + clatter_db), chatter_s, clip_ring, rise_s, hold)
    return case + thud + crack + clatter


def scene():
    """All sources at the one microphone; skids add power to rattle, crunch and spray."""
    skid = swells(SKIDS, SKID_RISE, SKID_FALL, SKID_LEAD)
    *ride_db, thud_db = in_time(RIDE_CURVE)
    case_db, crunch_db, spray_db = [
        10 * np.log10(from_db(db) ** 2 + (from_db(add_db) * skid) ** 2)
        for db, add_db in zip(ride_db, [SKID_RATTLE_DB, 0, SKID_SPRAY_DB])]
    shake = drift(28)   # how hard the bike jolts from moment to moment
    mount_db = case_db + thud_db + MOUNT_WANDER_DB * drift(7.8)
    ride = crunch(crunch_db, spray_db, shake) + rattle(case_db, mount_db, shake)
    return (buffeting() + ride + ticks() + knocks())[None]


def record(dry):
    """Dips at the port; only the highest peaks are rounded; the top is cut."""
    for hz, width_hz, depth in PORT_DIPS:
        dry = dry - np.clip(depth, 0, 1) * resonate(dry, [(hz, width_hz, 0)])
    rounded = dry / (1 + np.abs(dry / CLIP_LEVEL) ** 10) ** .1
    return signal.sosfilt(signal.cheby2(20, 70, CUTOFF_HZ, fs=SR, output="sos"), rounded)


dry = scene()
out = record(dry)
to_wav(out)
```